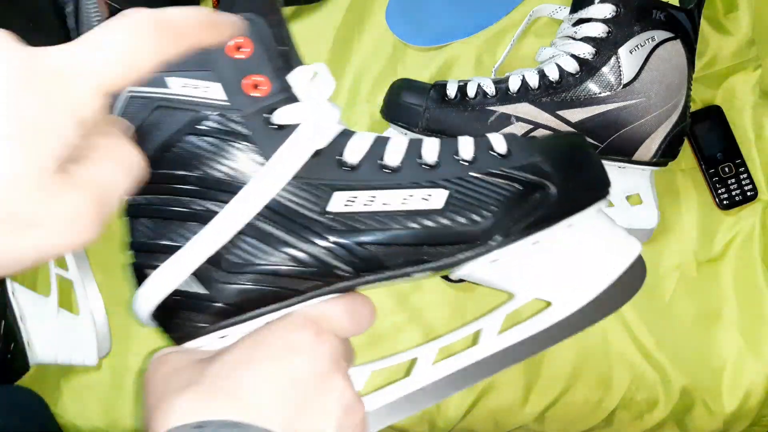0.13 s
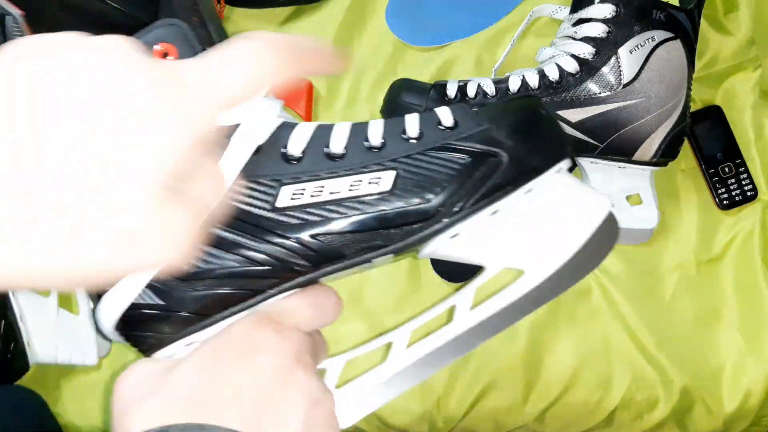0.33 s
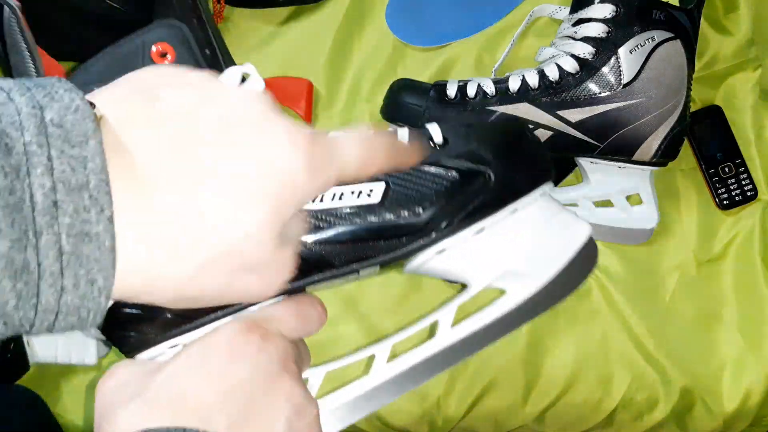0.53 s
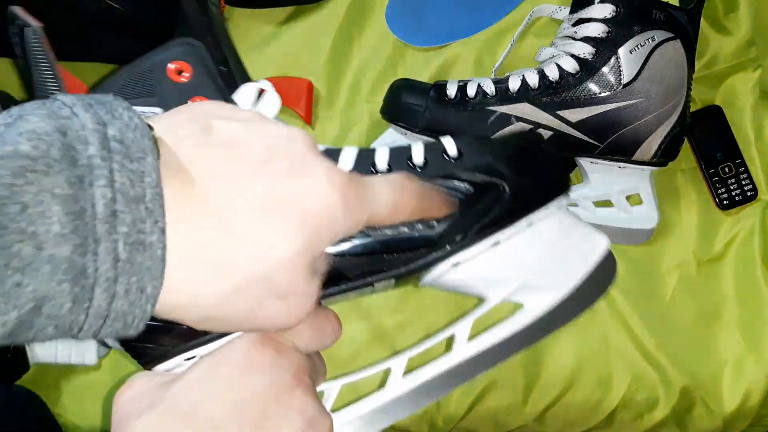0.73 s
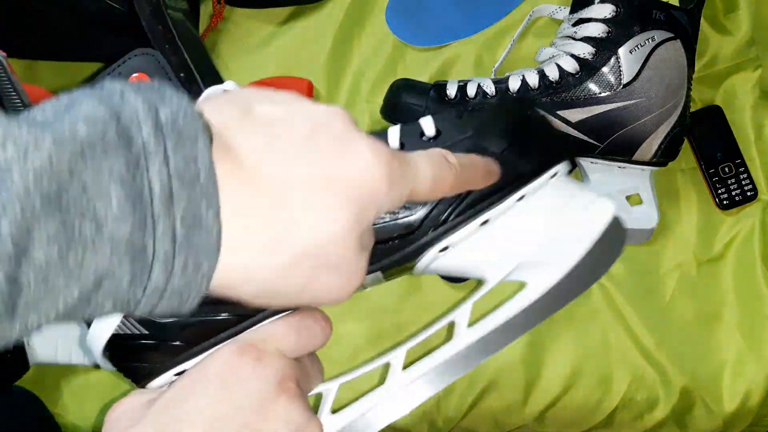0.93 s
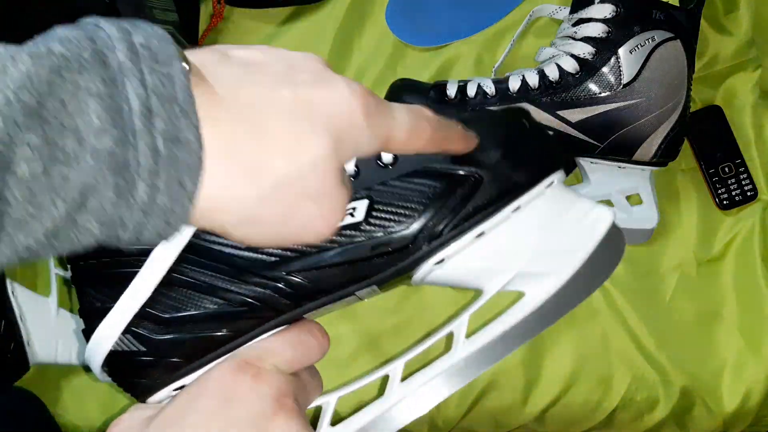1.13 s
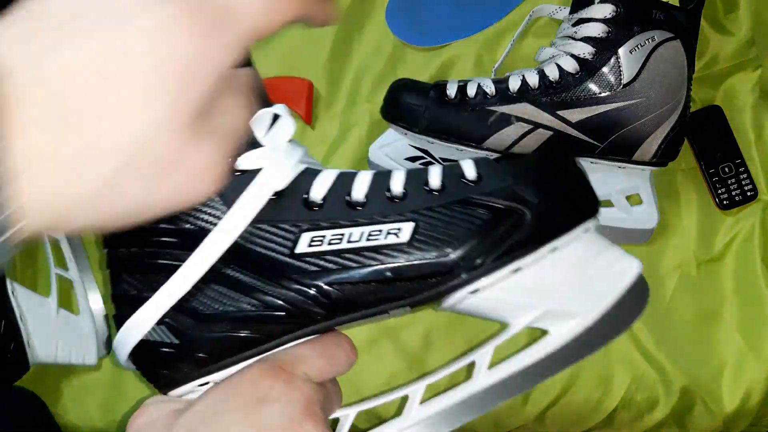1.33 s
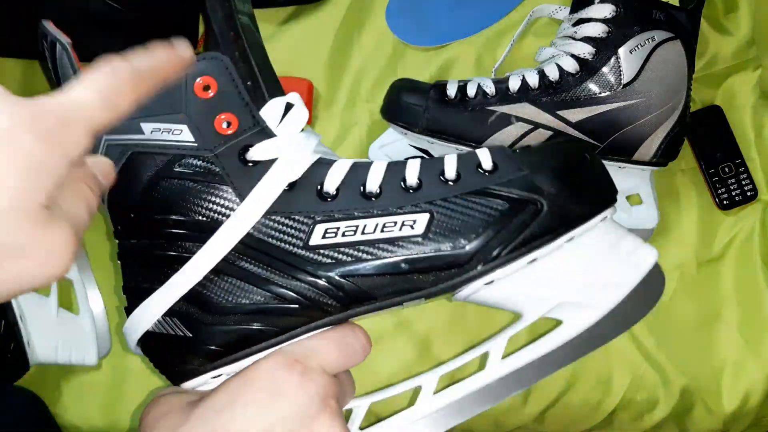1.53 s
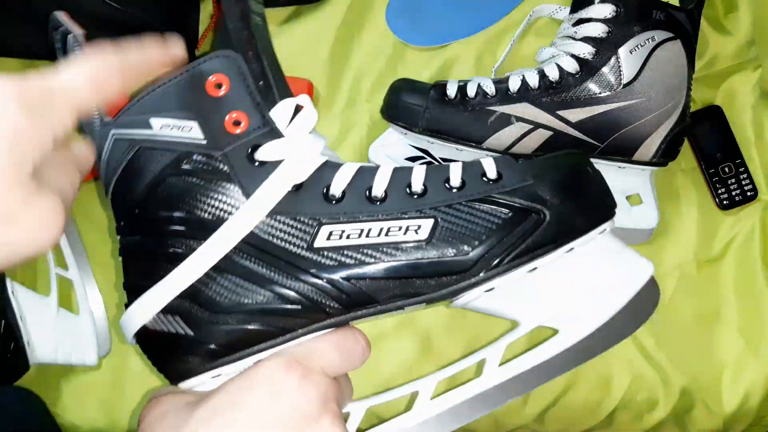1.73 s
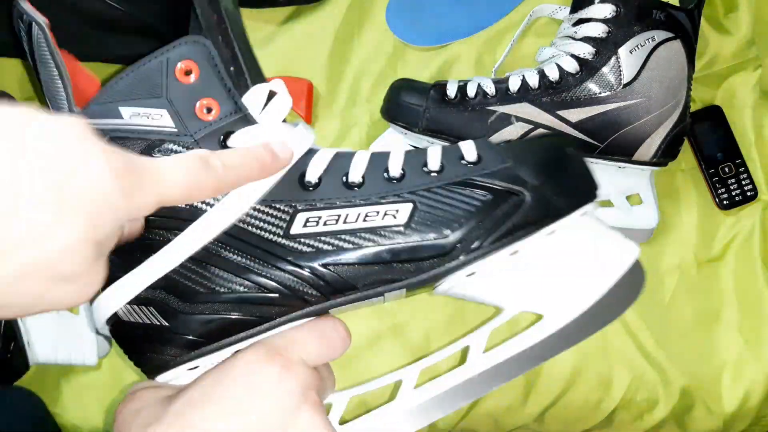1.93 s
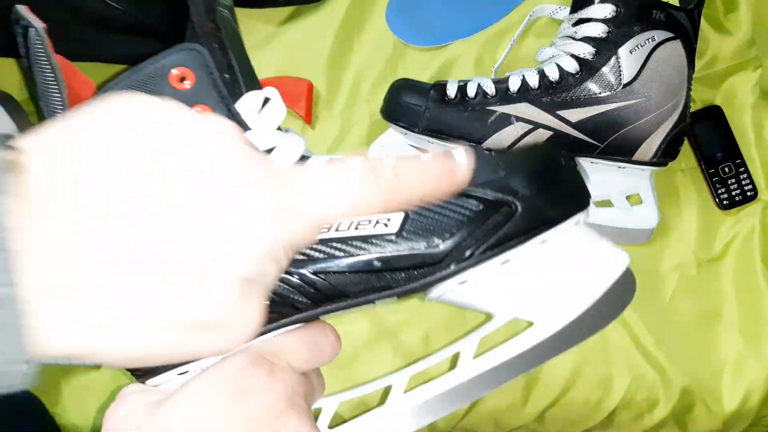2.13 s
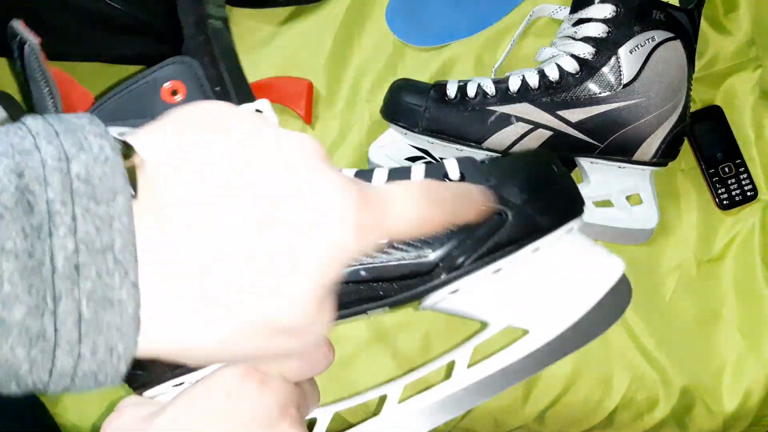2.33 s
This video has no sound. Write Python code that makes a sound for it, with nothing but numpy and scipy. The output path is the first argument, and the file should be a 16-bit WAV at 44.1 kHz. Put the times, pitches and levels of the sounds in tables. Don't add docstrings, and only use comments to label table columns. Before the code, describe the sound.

Finger taps on a stiff, padded skate boot, short and hollow. A tap is under way at 0 s, then a deep soft thump at 0.22, lighter clacks at 0.47, 0.7, 0.93 and a faint dry one at 1.13, the loudest thump at 1.45, soft pads at 1.66 and 1.92, a hard bright clack at 2.2. Nail ticks, skin scuffs, faint cloth rustle, low hum; small room, close phone.

```python
import sys
import numpy as np
from scipy import signal
from scipy.fft import rfft, irfft, next_fast_len
from scipy.io import wavfile
from scipy.ndimage import map_coordinates

SR = 44100
rng = np.random.default_rng(int(sys.argv[2]) if len(sys.argv) > 2 else 0)


def unload_wav(signal):
    wavfile.write(
        sys.argv[1],
        SR,
        np.round(np.clip(np.atleast_2d(signal).T, -1, 1) * 32767).astype(np.int16),
    )


def gain_from_decibels(decibels):
    exponent = np.asarray(decibels, float) / 20
    return 10 ** exponent


N = 109544
T = np.arange(SR // 2) / SR
LEAD = 2000


def unit(x):
    return x / np.sqrt(np.mean(x ** 2) + 1e-20)


def along(points, hz):
    f, v = np.transpose(points)
    return np.interp(np.log(hz + 1), np.log(f + 1), v)


def wobble(rate):
    return map_coordinates(rng.standard_normal(600), [np.arange(N) * rate / SR])


def coloured(spectrum):
    return lambda hz: gain_from_decibels(along(spectrum, hz)) * (hz >= spectrum[0][0]) * (hz <= spectrum[-1][0])


# frequency in Hz, left-right likeness (0 to 1).
LIKENESS = [(60, 0.95), (300, 0.95), (1500, 0.15), (5000, 0.12)]


def noise(gain, n=N):
    m = next_fast_len(n)
    hz = np.fft.rfftfreq(m, 1 / SR)
    turn = np.arccos(np.clip(along(LIKENESS, hz), -1, 1)) / 2
    spectra = rfft(rng.standard_normal((2, m))) * gain(hz) * [np.cos(turn), np.sin(turn)]
    mid, side = irfft(spectra, m)[:, :n]
    return unit(np.array([mid + side, mid - side]))


def narrow(bands):
    return sum(gain_from_decibels(db + 2.3 * wobble(3.35)) * noise(lambda f: 1 / (1 + (2 * (f - hz) / width) ** 2))
               for hz, width, db in bands)


def ring(hz, db, t60, rise_s, sag=0, turn=0):
    sag_s = 0.003
    turns = turn + hz * (T + sag * sag_s * (1 - np.exp(-T / sag_s)))
    return -gain_from_decibels(db - 60 * T / t60) * np.sin(2 * np.pi * turns) * (1 - np.exp(-(T / rise_s) ** 2))


def add(track, s, sound):
    i = round(s * SR) + LEAD
    track[..., i:i + sound.shape[-1]] += sound


# time in seconds, level in dB.
RUMBLE_LEVEL = [(0.0, -51), (0.14, -54.5), (0.25, -49.5), (0.36, -53.5), (0.98, -54.5), (1.08, -54.5),
                (1.36, -50), (1.57, -54), (1.81, -53), (1.96, -62.5), (2.18, -54.5), (2.35, -53.5),
                (2.48, -54)]
# frequency in Hz, density in dB per Hz.
HUM_COLOUR = [(18, -46), (30, -25), (58, 3.5), (86, 9), (107, -7), (180, -14.5), (230, -37), (400, -120)]
# frequency in Hz, width in Hz, level in dB.
MOTOR_LINES = [(84.8, 32.5, -0.5), (136.8, 4.3, -8)]
# time in seconds, level in dB.
STIR_LEVEL = [(0.0, -69.5), (0.28, -67.5), (0.4, -68), (0.65, -66.5), (0.74, -75), (0.95, -71.5),
              (1.41, -69.5), (1.62, -71), (1.75, -73), (1.951, -78.5), (2.26, -70.5), (2.37, -66),
              (2.48, -64)]
# frequency in Hz, density in dB per Hz.
CLOTH_COLOUR = [(110, -48.5), (180, -10), (295, -6.5), (336, -11), (484, -19), (564, -25.5), (1090, -29),
                (2240, -34.5), (3000, -49.5), (3900, -73.5), (6600, -120)]
# frequency in Hz, width in Hz, level in dB.
CLOTH_HOLLOWS = [(246, 19, -69), (305.5, 17, -67.5), (784.4, 25, -79.5), (1013, 30, -85), (1466, 60, -82),
                 (2100, 220, -84.5)]
# frequency in Hz, density in dB per Hz.
AIR_COLOUR = [(2500, -7.5), (3300, -9.5), (4500, -10), (7400, -12), (8400, -20), (10000, -14.5),
              (15000, -6.5), (15900, -14)]


def background():
    t = np.arange(N) / SR
    rumble_db = np.interp(t, *np.transpose(RUMBLE_LEVEL))
    stir_db = np.interp(t, *np.transpose(STIR_LEVEL))
    stir_db = stir_db - stir_db.mean()
    rumble = gain_from_decibels(rumble_db) * (gain_from_decibels(-2.5) * noise(coloured(HUM_COLOUR)) + narrow(MOTOR_LINES))
    rustle = gain_from_decibels(-60 + 0.9 * wobble(6.5)) * noise(coloured(CLOTH_COLOUR))
    cloth = gain_from_decibels(stir_db) * (rustle + narrow(CLOTH_HOLLOWS))
    hiss = gain_from_decibels(-77.5 + 0.5 * stir_db) * noise(coloured(AIR_COLOUR))
    return rumble + cloth + hiss


# frequency in Hz, t60 in seconds.
ROOM_DECAY = [(100, 0.35), (300, 0.087), (700, 0.4), (2000, 0.26), (8000, 0.27)]
# frequency in Hz, level in dB, t60 in seconds.
LOW_MODES = [(134.2, -3, 0.18), (253, 5.5, 0.22), (300.3, -9.5, 0.3), (389.3, -10, 0.42)]


def room(x):
    wet_db, modes_db, gap_s = -8, -60.5, 0.014
    hz, t, z = signal.stft(rng.standard_normal((2, len(T))), SR, nperseg=256)
    fading = z * gain_from_decibels(-60 * t / along(ROOM_DECAY, hz)[:, None])
    tail = signal.istft(fading, SR, nperseg=256)[1][:, :len(T)]
    tail = gain_from_decibels(wet_db) * tail / np.linalg.norm(tail[0])
    tail = tail + sum(ring(hz, modes_db + db + rng.normal(0, 1.0), t60, 0.0053)
                      for hz, db, t60 in LOW_MODES)
    late = np.pad(x, (round(gap_s * SR), 0))
    return signal.fftconvolve(late[None], tail, axes=1)


# frequency in Hz, density in dB per Hz.
SKIN_COLOUR = [(1650, -21), (2800, -5.5), (3280, -7), (4550, -2), (6120, -5), (7330, -4), (8730, -13),
               (12800, -6), (15800, -10)]


def skin(n, tilt=lambda f: 1):
    return noise(lambda f: coloured(SKIN_COLOUR)(f) * tilt(f), n)


# start in seconds, peak in dB, brightest frequency in Hz, top end in dB,
# t60 in seconds.
NAIL_TICKS = [(.0085, -51, 6500, -11, .005), (.018, -60, 5470, -11.5, .005), (0.2254, -48, 4900, -15, .006),
              (.256, -51, 4800, -12, 0.0054), (.3297, -58, 4400, -19, 0.0056),
              (0.3774, -57, 5400, -25, 0.0046), (0.4654, -53, 7350, -13, 0.0065),
              (0.486, -42, 4770, -16.5, 0.0068), (.506, -56, 5000, -23, 0.0091),
              (0.5749, -64, 5930, -9.5, .005), (.6117, -60, 5160, -17, .005),
              (0.6961, -44.5, 7430, -19, 0.0065), (0.7117, -55, 4910, -15, 0.0054),
              (0.718, -50.5, 4340, -13, 0.0066), (.8118, -59.5, 4840, -15, 0.0055),
              (0.9246, -43, 6800, -8.5, 0.0064), (.95, -54, 4560, -20, 0.0055),
              (1.1269, -47.5, 5570, -8, 0.005), (1.1497, -45.5, 5060, -17, 0.0047),
              (1.159, -53, 5500, -18, .005), (1.168, -59, 4600, -19, .01), (1.177, -59, 4900, -15, .015),
              (1.453, -54, 6660, -15, .006), (1.6605, -36.5, 6140, -6, 0.0051),
              (1.9289, -51.5, 6800, -12, 0.0074), (1.9366, -51, 6640, -7, 0.017),
              (1.9745, -52, 7800, -13, 0.015), (2.0039, -51, 6440, -18, 0.0046),
              (2.0945, -60, 6000, -14, .005), (2.2062, -41, 7100, -15, 0.0062),
              (2.2264, -40.5, 4500, -11, .006), (2.247, -52.5, 4680, -12, .006)]


def nail():
    table_s, table_db = 0.0042, -10.5
    out, t = np.zeros((2, N + SR)), T[:4096]
    for s, db, hz, top_db, t60 in NAIL_TICKS:
        rise = 1 - np.exp(-t / 0.0003)
        ping = gain_from_decibels(-5.5 - 62 * t / t60) * np.sin(2 * np.pi * hz * t) * rise
        shape = gain_from_decibels(-60 * t / t60) * rise

        def tilt(f):
            top = np.where(f > 8500, gain_from_decibels(top_db + 17), 1)
            return top / (1 + (3300 / (f + 1)) ** 8)

        for late_s, loss_db in ((0, 0), (table_s, table_db)):
            burst = shape * skin(len(t), tilt)
            burst = burst * np.linalg.norm(shape) / np.linalg.norm(burst[0])
            tick = ping * [[1], [-1]] + burst
            add(out, s + late_s, gain_from_decibels(db + 1.5 + loss_db) * tick)
    return out[:, LEAD:LEAD + N]


def clack(modes, db):
    spread = 0.08
    out = 0
    for hz, level, t60 in modes:
        struck_hz = hz * gain_from_decibels(rng.normal(0, 0.17))
        struck_db = db + level + rng.normal(0, 1.3, (2, 1))
        out = out + ring(struck_hz, struck_db, t60, 0.00099, turn=spread * rng.standard_normal((2, 1)))
    return out


# frequency in Hz, level in dB, t60 in seconds.
SHELL_MODES = [(808.5, -5.5, 0.052), (990, -2, 0.031), (1108, -3.5, 0.026), (1291, -10, 0.038)]
# frequency in Hz, level in dB, t60 in seconds.
HARD_MODES = [(1598, -15, 0.083), (1822, -5, 0.025), (2265, 0, 0.019), (2622, -16, 0.027)]


def shell(shell_db, hard_db):
    return clack(SHELL_MODES, shell_db) + clack(HARD_MODES, hard_db)


# start in seconds, length in seconds, level in dB.
DRAGS = [
    (0.723, 0.024, -62.5),
    (1.155, 0.038, -60),
    (1.931, 0.033, -69.5),
]


def drags(out):
    for s, length, db in DRAGS:
        stroke = np.sin(np.pi * np.minimum(T / length, 1))
        grit = rng.standard_normal(len(T)) ** 3 * stroke / 10
        brush = signal.fftconvolve(grit[None], shell(db, db - 8.5), axes=1)[:, :len(T)]
        add(out, s, brush + gain_from_decibels(db - 5.5) * stroke * skin(len(T)))
        add(out, s, room(brush.mean(axis=0)))


def scuff(db, t60):
    rub = gain_from_decibels(db - 60 * T / t60 + 1.7 * wobble(200)[:len(T)]) * skin(len(T))
    return rub * (1 - np.exp(-T / 0.0081))


def thump(hz, upper_hz, upper_db, body_db, t60, rise_s, sag, hold_s):
    left, release_s, sink_s = gain_from_decibels(-11.5), 0.0013, 0.00029
    choke = left + (1 - left) / (1 + np.exp(np.minimum((T - hold_s) / release_s, 50)))
    hollow = choke * (ring(hz, 0, t60, rise_s, sag) + ring(upper_hz, upper_db, 0.054, rise_s))
    body = ring(128, body_db, 0.094, rise_s)
    return np.pad(hollow + body, (round(sink_s * SR), 0))[:len(T)]


# start in seconds, peak in dB, pitch of the hollow in Hz, shell in dB, hardness in dB.
TAP_EVENTS = [
    (0.224, -8, 299.5, -27, -53),
    (0.465, -22, 305, -11, -22.5),
    (0.696, -24.5, 220, -14, -25),
    (0.925, -19.5, 282.4, -22, -26),
    (1.125, -29, 229, -14.5, -22),
    (1.454, -3, 294.4, -29, -55.5),
    (1.66, -19, 292.4, -38, -42.5),
    (1.922, -18.5, 274, -31, -43.5),
    (2.206, -18, 307.5, -17, -16),
]
# seconds, dB, Hz, dB, dB.
EARLY_TAP = (0.01, -20, 295, -22.5, -32.5)
# whole boot in dB, upper hollow in dB, scuff in dB,
# scuff t60 in seconds, hold in seconds.
LANDING = [(-6, -9, -63.5, .2, .012), (-20, -29, -59.5, 0.3, 0.01), (-10, -1.5, -60.5, 0.35, 0.0153),
           (-6, -3, -65, 0.44, 0.013), (-11, -20, -61.5, 0.29, .016), (-2, -0.5, -65, 0.46, 0.012),
           (-22, -18, -69.5, 0.51, 0.011), (-15.5, -19.5, -65, 0.34, 0.012),
           (-10.5, -12, -62.5, 0.4, 0.0097), (-18, -10.5, -52, 0.22, 0.021)]
# sag of the hollow (share of pitch),
# rise in seconds, hollow t60 in seconds, upper hollow in Hz, heel shell in dB.
PRESSING = [(0.29, .0023, 0.062, 372, -4.5), (.28, .0025, .055, 393, -2), (0.25, 0.0026, .06, 414, 0.5),
            (0.19, 0.0021, 0.044, 413, -2.5), (-.2, .0028, 0.059, 380, -4), (0.62, 0.0028, 0.061, 421, 0),
            (0.4, 0.0029, 0.053, 340, -6.5), (0.48, 0.0028, 0.074, 407, -2),
            (0.36, 0.0022, 0.047, 390, 5.5), (0.31, 0.0029, .058, 370, 1)]
# frequency in Hz, level in dB, t60 in seconds.
HEEL_MODES = [(569, -1, .045), (635.4, -2, 0.066), (710, -1, 0.048)]


def taps(out):
    touch_s = 0.00045
    for tap, landing, pressing in zip([EARLY_TAP, *TAP_EVENTS], LANDING, PRESSING):
        s, db, hz, shell_db, hard_db = tap
        body_db, upper_db, scuff_db, scuff_t60, hold_s = landing
        sag, rise_s, t60, upper_hz, heel_db = pressing
        deep = thump(hz, upper_hz, upper_db, body_db, t60, rise_s, sag, hold_s)
        hard = clack(HEEL_MODES, shell_db + heel_db) + shell(shell_db - 0.5, hard_db + 2)
        strike = gain_from_decibels(db + 3) * (deep + hard)
        add(out, s + touch_s, strike + scuff(scuff_db, scuff_t60))
        add(out, s + touch_s, room(strike.mean(axis=0)))


def boot():
    out = np.zeros((2, N + 2 * SR))
    taps(out)
    drags(out)
    return out[:, LEAD:LEAD + N]


# frequency in Hz, left over right in dB.
BALANCE = [(30, 0), (80, 1.5), (130, 1.5), (300, 3), (900, 2.5), (3000, 4), (6000, 6)]
# frequency in Hz, lead of the left port in radians.
PORT_LEAD = [(130, 0.088), (300, .55), (700, 0.74), (1500, .9), (2330, .55), (4100, 2.5), (9000, 3.7)]


def scene():
    m = next_fast_len(N + 4096)
    hz, side = np.fft.rfftfreq(m, 1 / SR), np.array([[0.5], [-0.5]])
    low_cut = 1 / (1 + (35 / (hz + 1)) ** 6)
    ports = gain_from_decibels(side * along(BALANCE, hz)) * np.exp(1j * side * along(PORT_LEAD, hz)) * low_cut
    mix = background() + nail() + boot()
    return irfft(rfft(mix, m) * ports, m)[:, :N]


def band_limit(x):
    return signal.sosfilt(signal.butter(12, 16620, fs=SR, output="sos"), x)


def record(dry):
    return band_limit(dry)


dry = scene()
out = record(dry)
unload_wav(out)
```